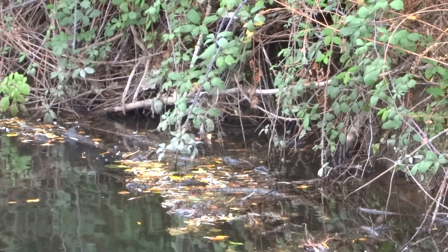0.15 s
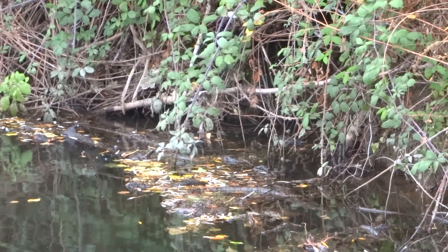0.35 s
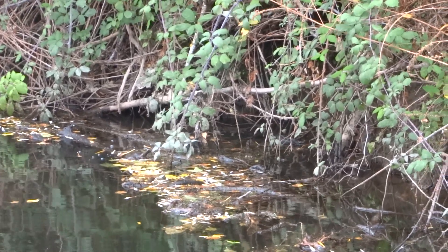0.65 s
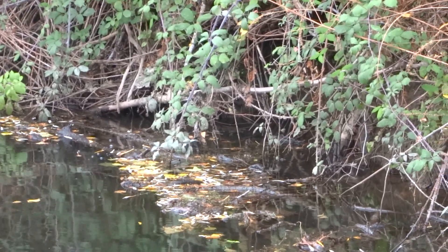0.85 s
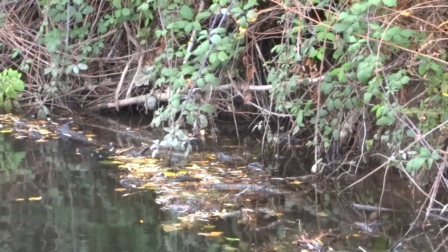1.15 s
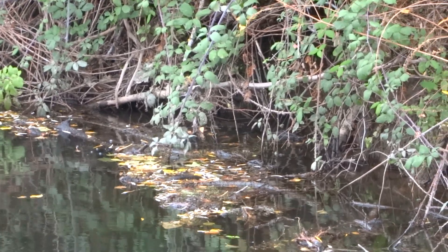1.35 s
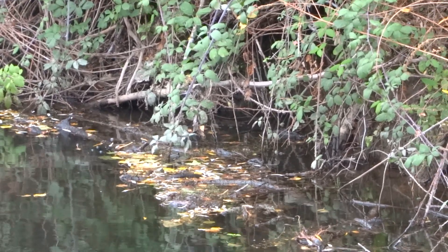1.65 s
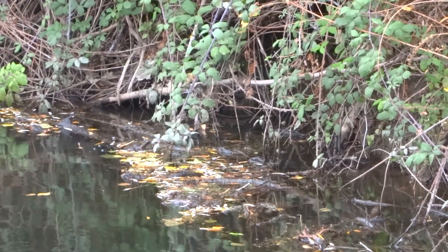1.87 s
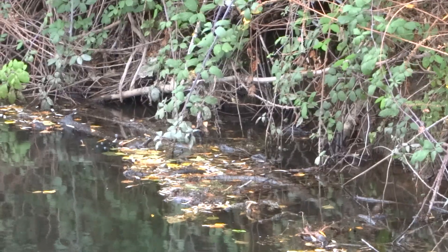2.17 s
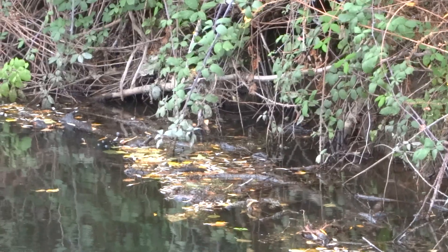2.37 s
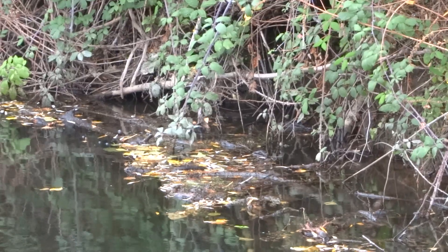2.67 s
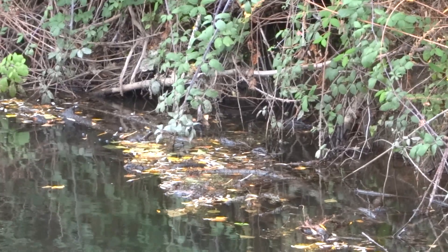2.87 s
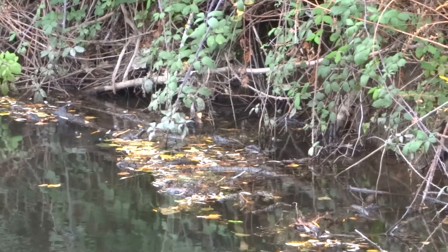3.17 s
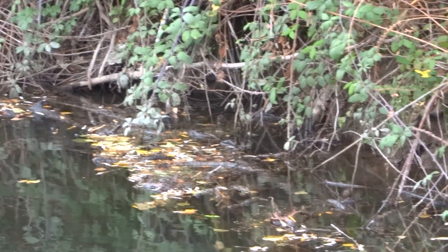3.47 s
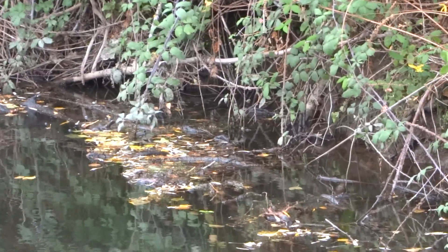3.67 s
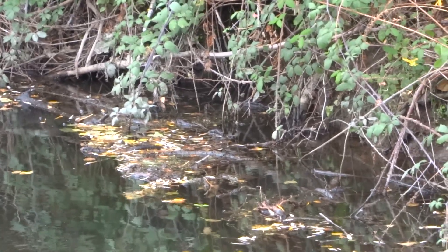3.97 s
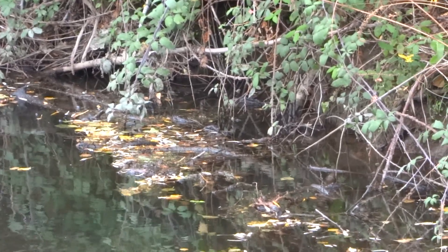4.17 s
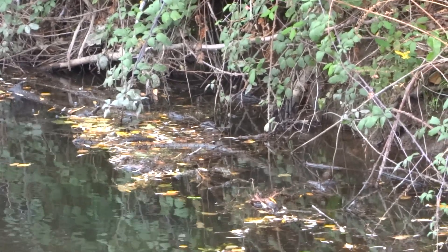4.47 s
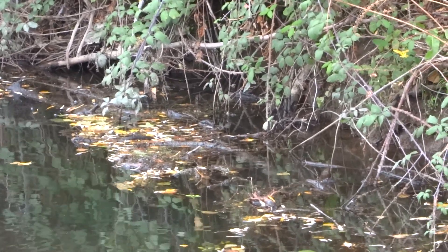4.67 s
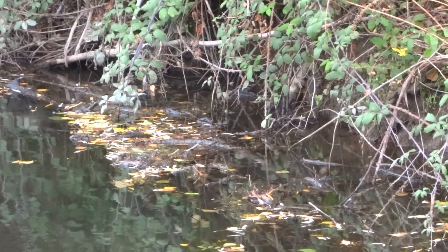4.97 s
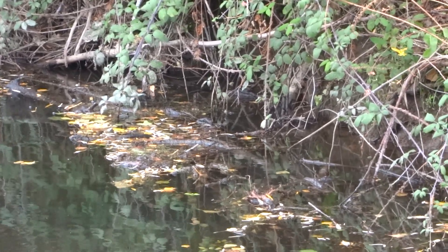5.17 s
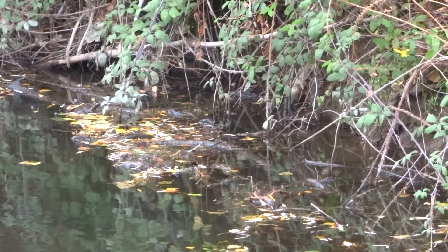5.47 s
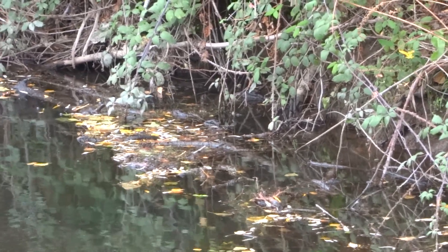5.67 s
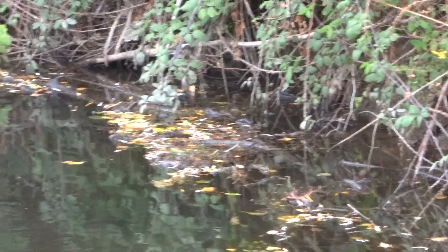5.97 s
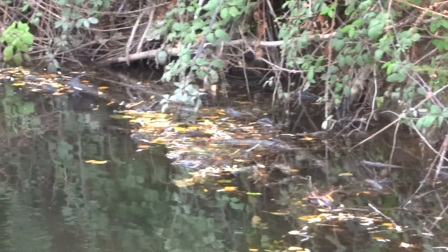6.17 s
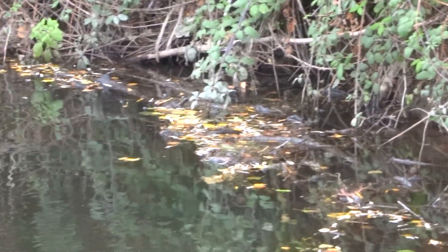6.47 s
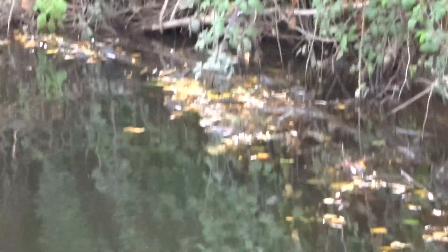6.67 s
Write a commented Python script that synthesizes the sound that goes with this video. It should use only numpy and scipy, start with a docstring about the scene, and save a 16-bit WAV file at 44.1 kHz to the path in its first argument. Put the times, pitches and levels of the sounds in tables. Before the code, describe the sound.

An otter gives four short, high whistles that ring along a riverbank, over a soft hiss of water and leaves and faint birds.

```python
"""An otter whistles by the river

An otter gives four short, high, arched whistles from the overgrown bank of a slow river.
Brambles and the far bank scatter each call into a ringing tail. Behind it are the hiss of water
and leaves, faint small birds, a hand softly rubbing and bumping a camera, and one twig-like tick."""
import sys
import numpy as np
from scipy import signal
from scipy.fft import rfft, irfft
from scipy.io import wavfile

SR = 44100
rng = np.random.default_rng(int(sys.argv[2]) if len(sys.argv) > 2 else 0)


def dump_mix(stems):
    """Bounce the given channels to the path in sys.argv[1] as a 16-bit WAV at rate SR."""
    frames = np.atleast_2d(stems).T  # one column per channel
    limited = np.clip(frames, -1, 1)  # hard clip at full scale
    pcm = np.round(limited * 32767).astype(np.int16)
    wavfile.write(sys.argv[1], SR, pcm)


N = 300742
T, HZ = np.arange(N) / SR, np.fft.rfftfreq(N, 1 / SR)


def amp(db):
    """Turns decibels into a number to multiply by."""
    return 10 ** (np.asarray(db) / 20)


def evened(x):
    """Scales a signal to an average strength (rms) of one."""
    return x / np.sqrt(np.mean(x ** 2) + 1e-20)


def curve(points):
    """Joins (f/Hz, value) points into a line over all frequencies, spaced by octaves."""
    f, value = np.transpose(points)
    return np.interp(np.log(HZ + 1), np.log(f + 1), value)


def add(mix, start_s, sound):
    """Lays a sound into the mix at a given time."""
    part = mix[max(round(start_s * SR), 0):][:len(sound)]
    part += sound[:len(part)]


def white():
    """The spectrum of fresh white noise."""
    return rfft(rng.standard_normal(N))


def waver(count, rate_hz):
    """A smooth random wobble, mostly slower than the given rate."""
    return evened(irfft(white() * np.exp(-(HZ / rate_hz) ** 2), N))[:count]


def hump(t, middle_s, half_width_s, db):
    """A level that swells and fades like a bell curve."""
    return amp(db) * np.exp(-((t - middle_s) / half_width_s) ** 2)


def scatter(sound, ring_s, build_s):
    """Countless weak echoes, together as strong as the sound, build up and fade 60 dB in ring_s."""
    t = T[:SR]
    echoes = rng.standard_normal(SR) * (1 - np.exp(-t / build_s)) * amp(-60 * t / ring_s)
    tail = signal.fftconvolve(sound, echoes)[:N]
    tail -= sound * (tail @ sound) / (sound @ sound)  # keep only what is out of step with the sound
    return np.std(sound) * evened(tail)


def from_left(sound, lean_db, lag_samples=0.73, fade_hz=9000):
    """Makes stereo: the left side is louder and a touch later; the lag fades in the top treble."""
    turn = np.pi * HZ * lag_samples / SR / (1 + (HZ / fade_hz) ** 4)
    tilt = amp(lean_db / 2) * np.exp(-1j * turn)
    return irfft(rfft(sound) * np.array([tilt, 1 / tilt]), N)


# The tone colour of the hiss: f/Hz, relative level/dB
HISS_COLOUR = [(20, -11.5), (60, -6), (110, -3), (230, -0.5), (750, -0.5), (1400, -2.5), (2000, -2),
               (5500, -4), (7000, -6.5), (8000, -11.5), (9200, -15), (10800, -13), (12500, -16.5),
               (15500, -23)]
# Its slow drift, used only as a change around the average: t/s, level/dB
HISS_DRIFT = [(0.0, -58.5), (1.19, -58), (2.01, -58), (2.49, -57.5), (5.6, -58.5), (6.82, -57.5)]
# How alike its two sides are: f/Hz, likeness/0 to 1
HISS_LIKENESS = [(60, 1), (130, 0.86), (280, 0.92), (550, 0.67), (1400, 0.83), (2000, 0.75), (7000, 0.92),
                 (9200, 0.81), (10800, 0.99)]
# How much louder its left side is: f/Hz, left minus right/dB
HISS_LEAN = [(130, 0), (1000, 1.2), (2000, 2), (5500, 3), (8000, 3), (10800, -0.1)]
# How far its left side runs ahead (negative is behind): f/Hz, phase/radians
HISS_LEAD = [(130, -0.018), (280, -0.74), (550, -1.16), (1400, -1.09), (3000, -0.55), (7000, -0.36),
             (10800, 0)]
def hiss(level_db=-56):
    """Water and leaves make an even hiss, partly shared by left and right."""
    likeness = curve(HISS_LIKENESS)
    left = white()
    right = likeness * left + np.sqrt(1 - likeness ** 2) * white()
    right *= np.exp(-1j * curve(HISS_LEAD))
    lean = amp(curve(HISS_LEAN) / 2)
    pair = irfft(np.array([left * lean, right / lean]) * amp(curve(HISS_COLOUR)), N)
    times, db = np.transpose(HISS_DRIFT)
    drift_db = np.interp(T, times, db - db.mean())
    return pair / np.std(pair.mean(0)) * amp(level_db + drift_db)


# The tone colour of the rubbing hand: f/Hz, relative level/dB
GRIP_SPECTRUM = [(20, -14), (70, 0.5), (200, 5.5), (350, -14), (1000, -40), (4000, -65)]
# Each shift of the hand: middle t/s, half width/s, level/dB
GRIP_SHIFTS = [(.1, 0.55, -77), (2.2, 0.42, -73), (5.85, 0.32, -72), (6.6, 0.65, -72.5)]
def grip():
    """A hand shifting on the camera makes a faint, low rustle."""
    rustle = evened(irfft(white() * amp(curve(GRIP_SPECTRUM)), N))
    return rustle * sum(hump(T, *shift) for shift in GRIP_SHIFTS)


# The tone colour of a bump: f/Hz, relative level/dB
BUMP_SPECTRUM = [(15, -18), (35, 6), (65, 10.5), (95, 0), (140, -3.5), (300, -43), (1000, -90)]
# Each bump of the hand: middle t/s, length/s, level/dB
HAND_BUMPS = [(0.043, 0.081, -63.5), (0.178, 0.0386, -53), (1.61, 0.081, -67.5), (1.93, .2, -68),
              (2.479, 0.19, -65.5), (3.95, 0.082, -71), (5.576, 0.064, -71), (5.834, .11, -68)]
def bumps():
    """Soft, low thuds of the hand travel through the camera body."""
    rumble = irfft(white() * amp(curve(BUMP_SPECTRUM)), N)
    out = np.zeros(N)
    for middle_s, length_s, db in HAND_BUMPS:
        count = int(length_s * SR)
        thud = np.hanning(count) * rumble[int(middle_s * SR):][:count]
        add(out, middle_s - length_s / 2, amp(db) * evened(thud))
    return out


def chirp(length_s, start_hz, end_hz, rasp, warble=0.049, shake_hz=700):
    """A bird's thin, gliding note; the more its pitch shakes, the raspier it sounds."""
    t, knots = np.arange(0, length_s, 1 / SR), np.arange(0, length_s, 1 / shake_hz)
    shake = np.interp(t, knots, rng.standard_normal(len(knots)))
    hz = np.linspace(start_hz, end_hz, len(t)) * (1 + warble * rasp * shake)
    return evened(np.hanning(len(t)) * np.sin(2 * np.pi * np.cumsum(hz) / SR))


def scolding(count=4, start_s=.04, every_s=.102, note_s=.055, hz=4410, db=-60.5):
    """One bird gives a quick, even run of raspy notes."""
    song = np.zeros(N)
    for k in range(count):
        add(song, start_s + k * every_s, amp(db) * chirp(note_s, hz, hz, rasp=1.9))
    return song


# The clearer chirps of far birds: t/s, start f/Hz, end f/Hz, level before the blur/dB
BIRD_CHIRPS = [(1.50, 5500, 5780, -62.5), (1.53, 7200, 6800, -64), (1.79, 4230, 4660, -59.5),
               (2.275, 7300, 7500, -68), (2.36, 7400, 6600, -62), (2.56, 4300, 4170, -61),
               (2.85, 7500, 6900, -65), (3.145, 7470, 7100, -62.5), (4.265, 5000, 5600, -63),
               (5.03, 5130, 5900, -62), (5.27, 6320, 6430, -61)]
def birds(straight_db=-3, echo_db=-4, twitters=70, twitter_db=-82.5):
    """Small birds scold, chirp and twitter, blurred by distance."""
    song = scolding()
    for start_s, start_hz, end_hz, db in BIRD_CHIRPS:
        add(song, start_s, amp(db) * chirp(0.0417, start_hz, end_hz, rasp=.45))
    for when, pitch, glide in rng.random((twitters, 3)):
        start_s, hz = when * T[-1], 5800 + 1700 * pitch
        lively_spell = hump(start_s, middle_s=1.9, half_width_s=0.96, db=-64.5)
        twitter = chirp(0.039, hz, hz + 1200 * (glide - .5), rasp=.8)
        add(song, start_s, (amp(twitter_db) + lively_spell) * twitter)
    blur = scatter(song, ring_s=0.15, build_s=0.0054)
    return from_left(amp(straight_db) * song + amp(echo_db) * blur, lean_db=2.5)


CLIMB, CLIMB_S, CLIMB_POWER = .115, .092, 2.5  # the pitch starts this share below its top and eases up
DROP, DROP_MOST = .1, .5  # rough share of the pitch lost as the trail begins, and the most it can lose
LEAD_IN_DB, OPEN_S = -14, 0.0068  # the voice starts softly, then snaps open
CREST_S, SWELL_S = 0.085, 0.042  # the loudest moment; it is swell_db quieter SWELL_S before and after
RELEASE_DB, RELEASE_S = -22, 0.0082  # the voice shuts down to a faint trail
def whistle(length_s, trail_s, top_hz, lead_s, fall_s, swell_db, growth, jitter=0.0012, flutter_db=.5):
    """The otter's nearly pure tone arches up, holds and drops; returns it and its overtones."""
    t = np.arange(0, length_s + trail_s, 1 / SR)
    climb = CLIMB * np.maximum(1 - t / CLIMB_S, 0) ** CLIMB_POWER
    drop = DROP_MOST * np.tanh(DROP / DROP_MOST * np.exp((t - length_s) / fall_s))
    hz = top_hz * (1 - climb - drop) * (1 + jitter * waver(len(t), rate_hz=250))
    phase = 2 * np.pi * np.cumsum(hz) / SR
    db = LEAD_IN_DB * np.clip(1 - (t - lead_s) / OPEN_S, 0, 1)
    db += RELEASE_DB * np.clip((t - length_s) / RELEASE_S, 0, 1)
    db += flutter_db * waver(len(t), rate_hz=120)
    db -= swell_db * ((t - CREST_S) / SWELL_S) ** 2
    soft_edges = np.sqrt(2) * signal.windows.tukey(len(t), .04)
    overtones = amp(-10) * np.sin(2 * phase) + amp(-31) * np.sin(3 * phase)
    # with growth below one the overtones swell less than the tone, so the soft ends sound reedier
    return soft_edges * amp(db) * np.sin(phase), soft_edges * amp(growth * db) * overtones


# The otter's calls: t/s, length/s, faint trail/s, top f/Hz, soft start/s, fall time/s, effort/dB,
# straight path/dB, swell/dB, late echo/dB, overtones/dB, overtone growth/dB per dB of the tone
OTTER_CALLS = [(0.431, 0.15, 0.011, 5220, 0.013, .018, -39.5, -1.5, 0.44, -24, 0.7, 0.8),
               (1.984, .152, 0.013, 5125, 0.026, .011, -34, -1, 2.5, -36, -1, .5),
               (3.337, .141, 0.0071, 5220, 0.02, 0.0168, -38, 12.5, 4.5, -31, 3.5, 1.7),
               (4.692, .141, 0.029, 5008, 0.027, .012, -32, 16, 6, -38, -2, 0.47)]
# How much louder each call is on the left: left minus right/dB
CALL_LEANS = [3.7, 3.7, 5.2, 3.6]
def otter(bramble_db=0.5, bank_db=-0.5, late_s=0.43):
    """Each whistle arrives straight, through the nearby brambles, and back from the banks."""
    out = np.zeros((2, N))
    for call, lean_db in zip(OTTER_CALLS, CALL_LEANS):
        start_s, length_s, trail_s, top_hz, lead_s, fall_s = call[:6]
        effort_db, straight_db, swell_db, late_db, overtone_db, growth = call[6:]
        low, high = whistle(length_s, trail_s, top_hz, lead_s, fall_s, swell_db, growth)
        tone, overtones = np.zeros((2, N))
        add(tone, start_s, low)
        add(overtones, start_s, amp(overtone_db) * high)
        heard = amp(straight_db) * tone
        heard += amp(bramble_db) * scatter(tone, ring_s=0.29, build_s=0.0042)
        heard += amp(bank_db) * scatter(tone, ring_s=0.63, build_s=0.019)
        # the far bank sends back a faint, late echo
        heard += amp(late_db) * np.roll(scatter(tone, ring_s=0.33, build_s=.008), round(late_s * SR))
        # the short waves of the overtones arrive mostly scattered and die before the banks' echo
        heard += amp(-6) * overtones + amp(-1) * scatter(overtones, ring_s=0.37, build_s=0.0018)
        out += amp(effort_db) * from_left(heard, lean_db)
    return out


# The single tick: t/s, level/dB
TWIG_TICK = (5.814, -50)
def twig(decay_s=0.0058, band_hz=(1000, 3500)):
    """A burst of noise dies at once: a light, dry tick, as of a twig."""
    start_s, db = TWIG_TICK
    t, out = T[:2000], np.zeros(N)
    band = signal.butter(2, band_hz, "band", fs=SR, output="sos")
    snap = signal.sosfilt(band, rng.standard_normal(len(t)))
    add(out, start_s, amp(db) * evened(snap) * np.exp(-t / decay_s))
    return out


def scene():
    """The otter over the quiet riverside."""
    return hiss() + grip() + bumps() + birds() + otter() + twig()


def record(dry, edge_hz=15700):
    """Cuts away the very highest treble."""
    low_pass = signal.firwin(801, edge_hz, window=("kaiser", 9), fs=SR)
    return signal.oaconvolve(dry, low_pass[None], "same")


dry = scene()
out = record(dry)
dump_mix(out)
```